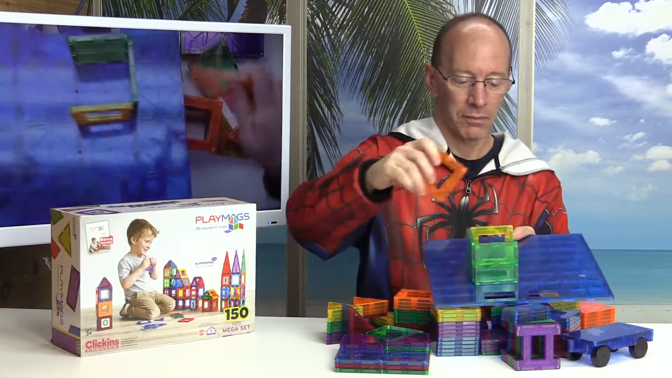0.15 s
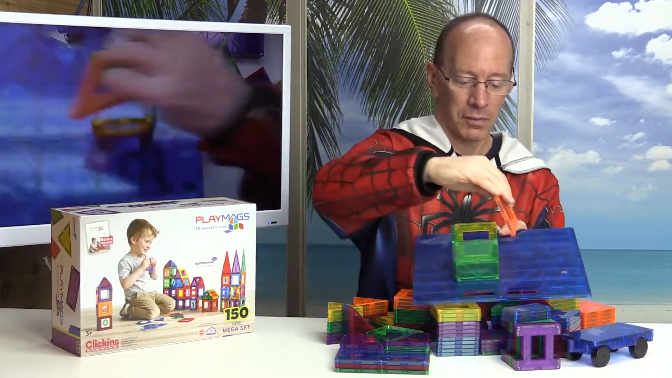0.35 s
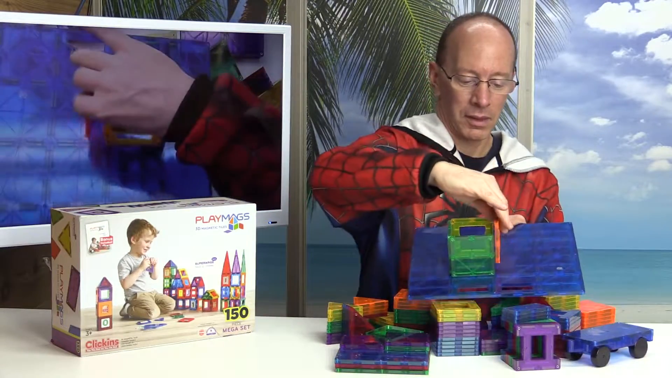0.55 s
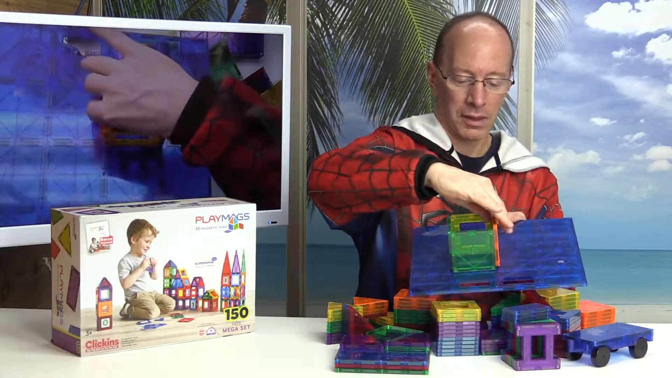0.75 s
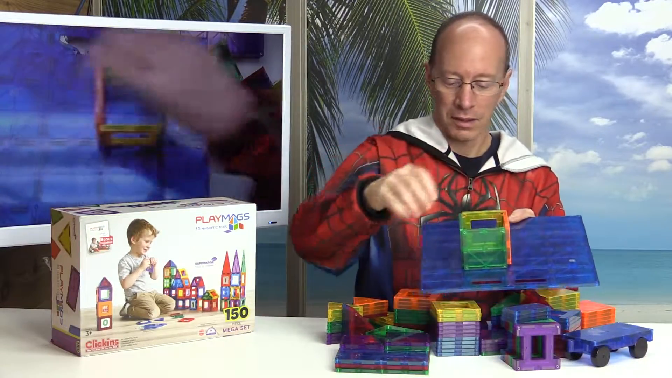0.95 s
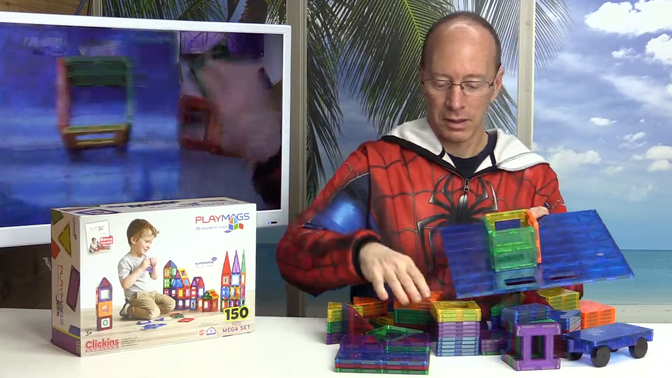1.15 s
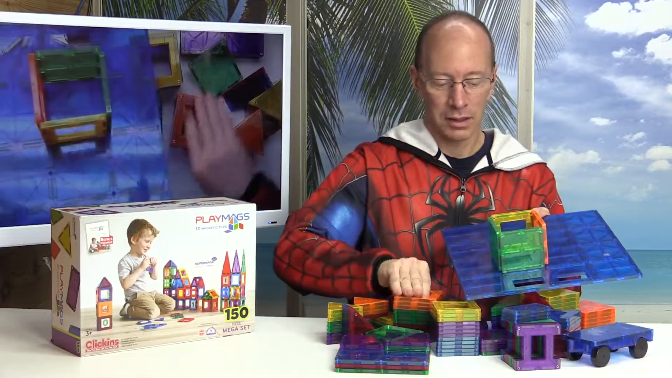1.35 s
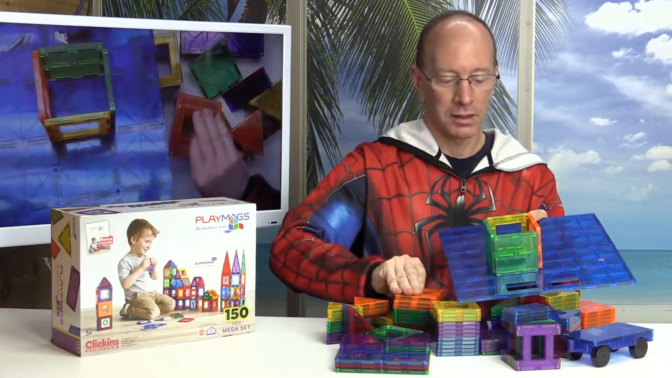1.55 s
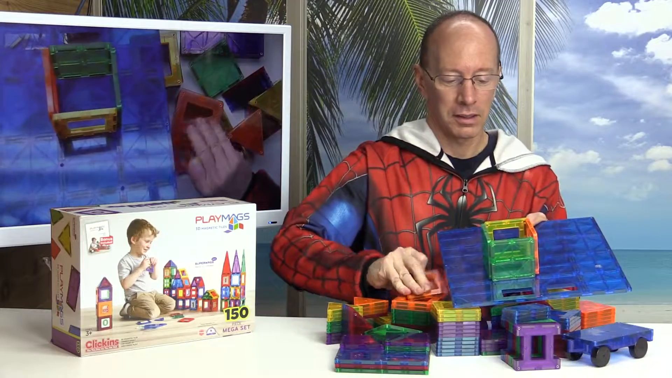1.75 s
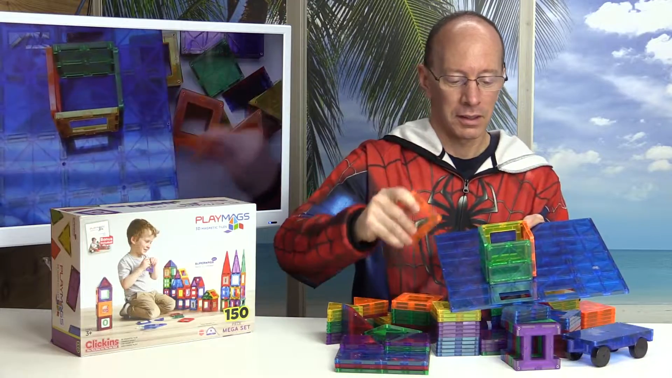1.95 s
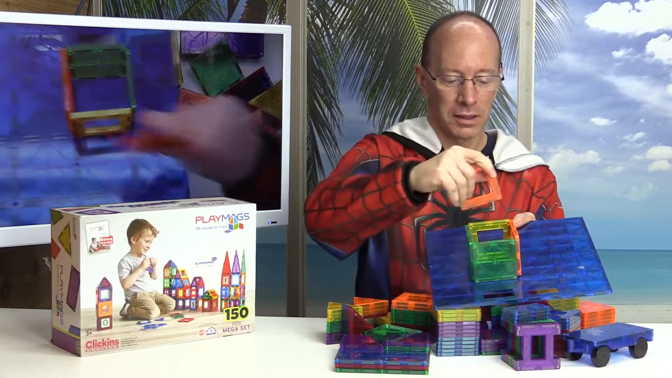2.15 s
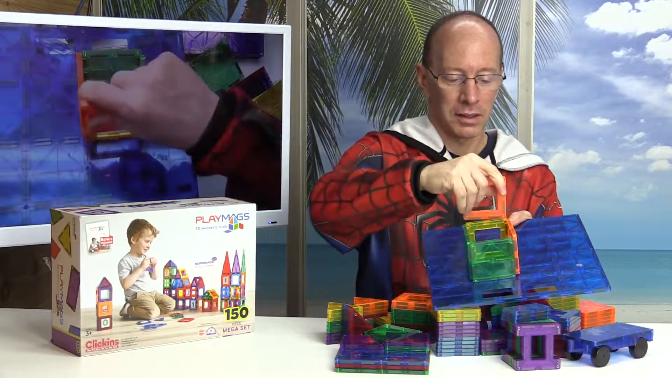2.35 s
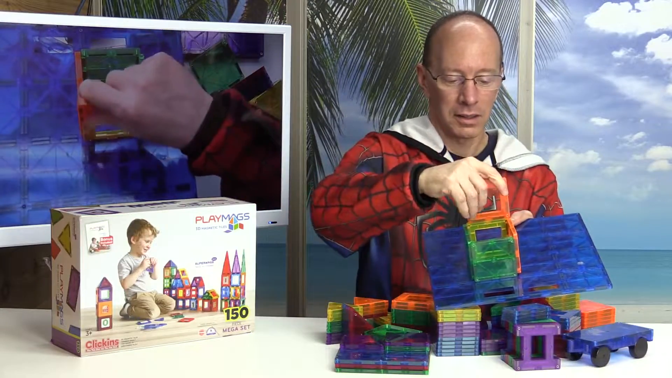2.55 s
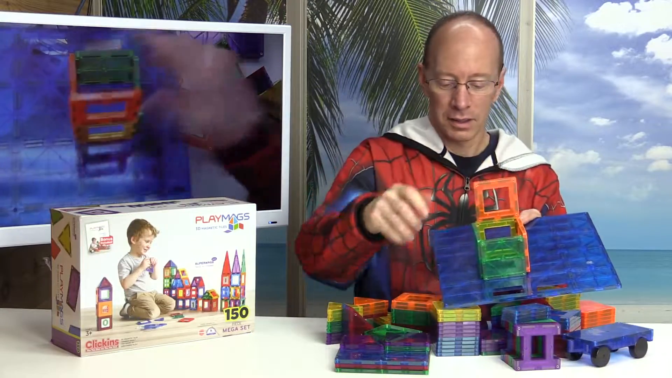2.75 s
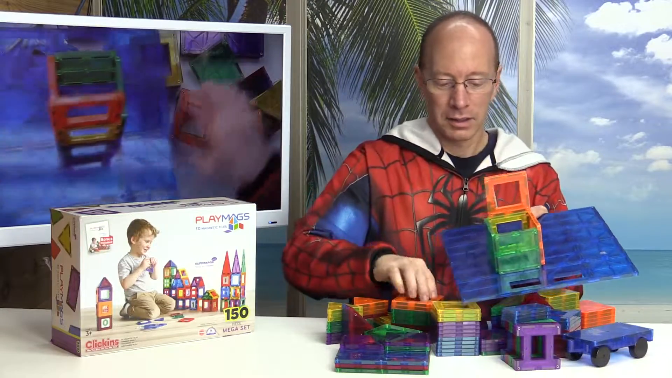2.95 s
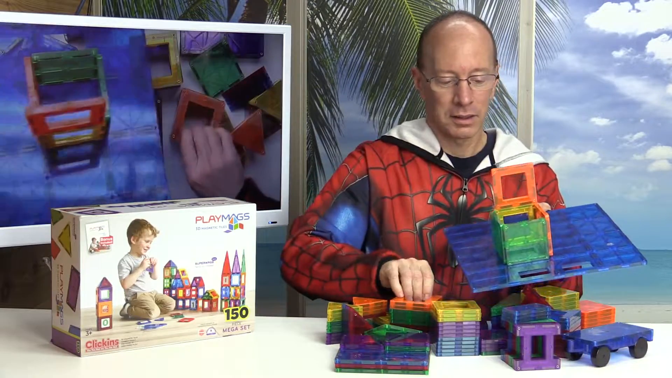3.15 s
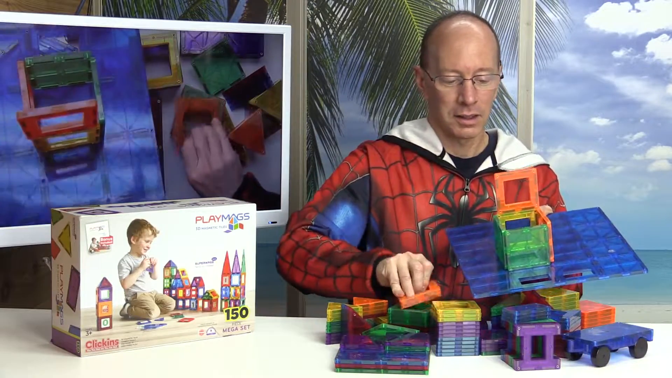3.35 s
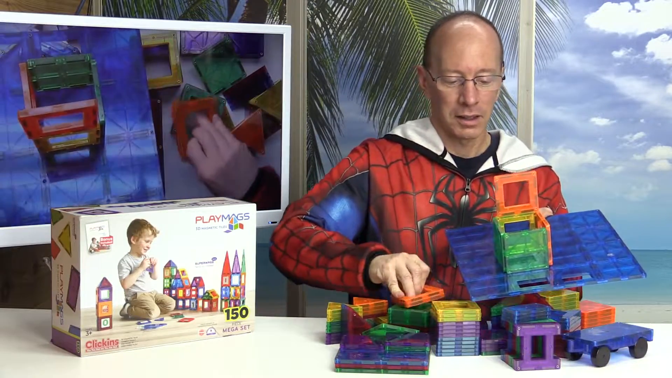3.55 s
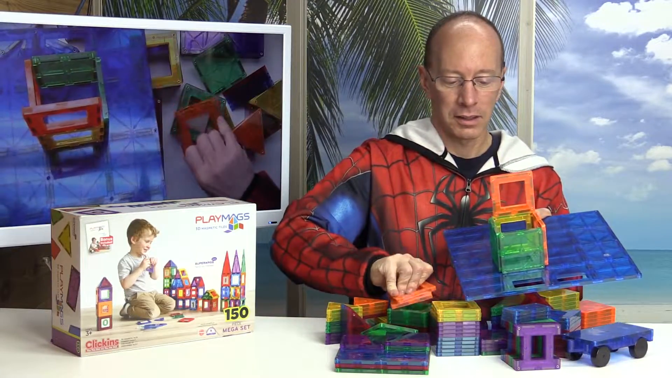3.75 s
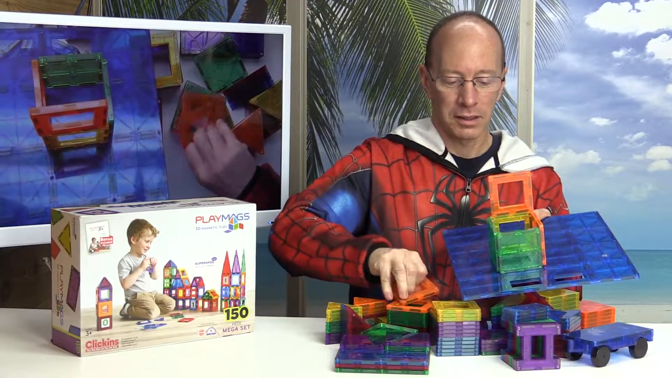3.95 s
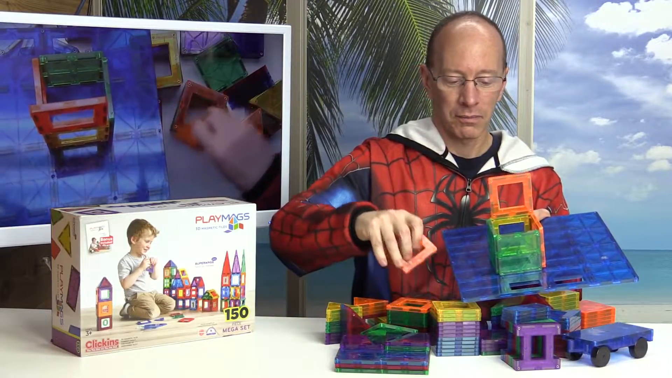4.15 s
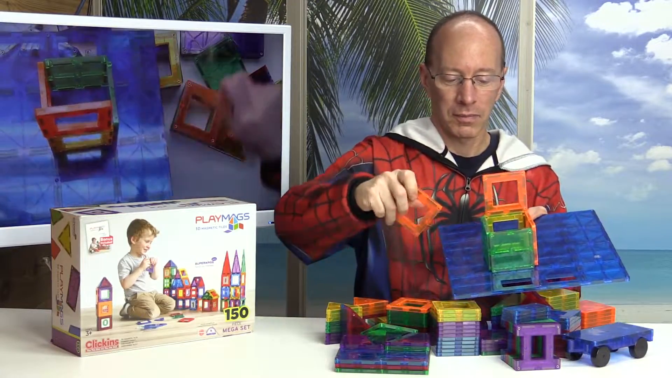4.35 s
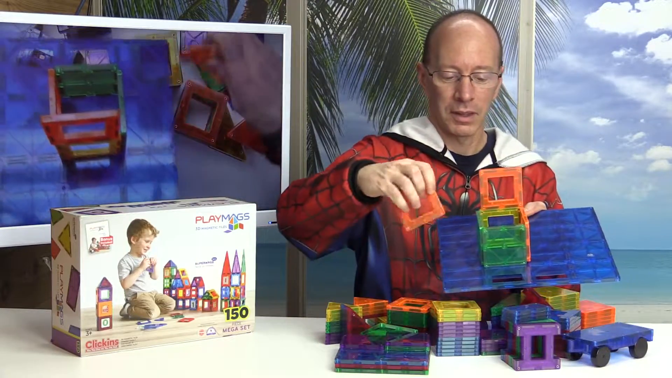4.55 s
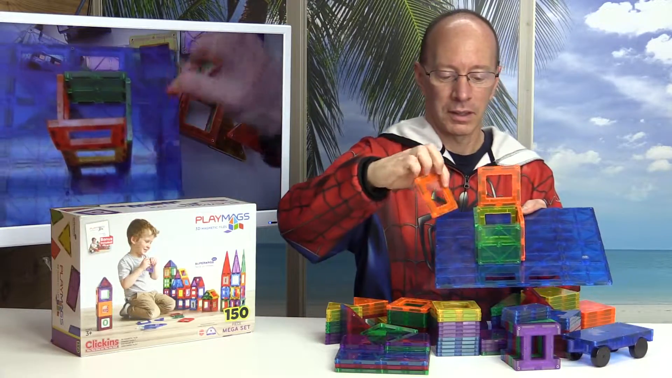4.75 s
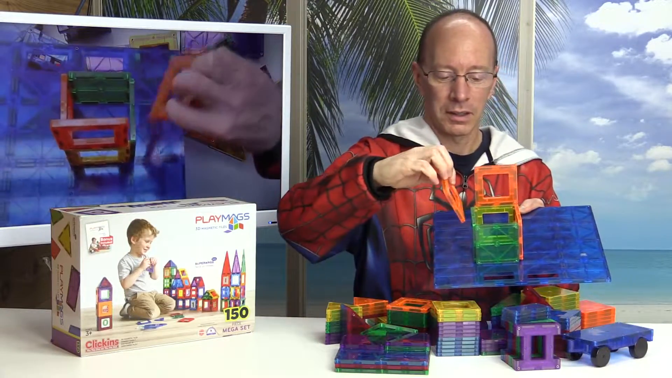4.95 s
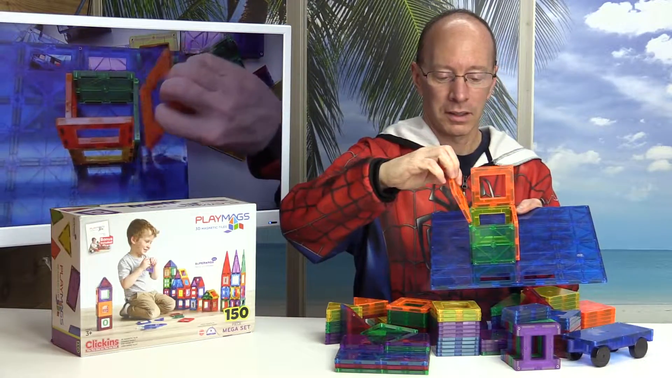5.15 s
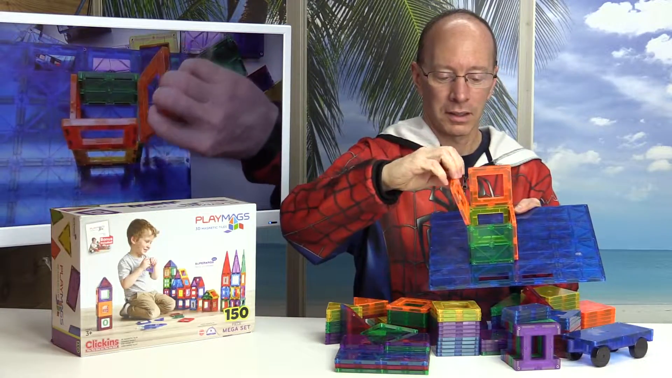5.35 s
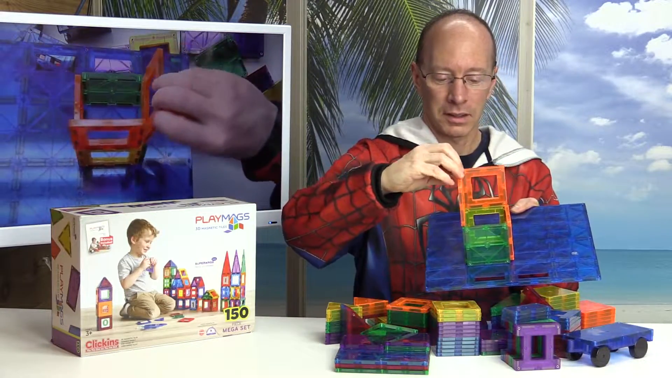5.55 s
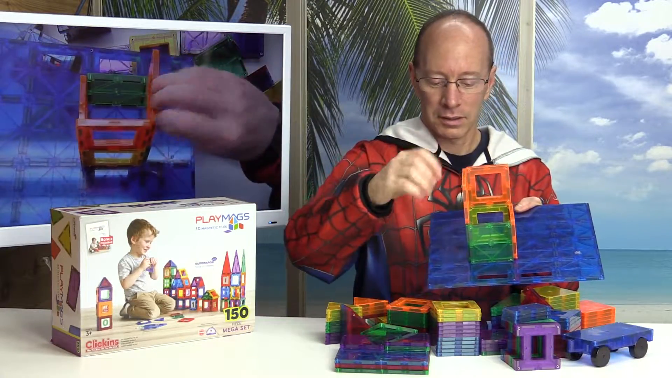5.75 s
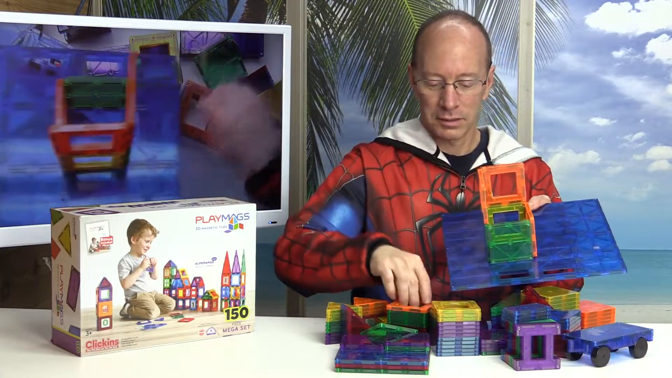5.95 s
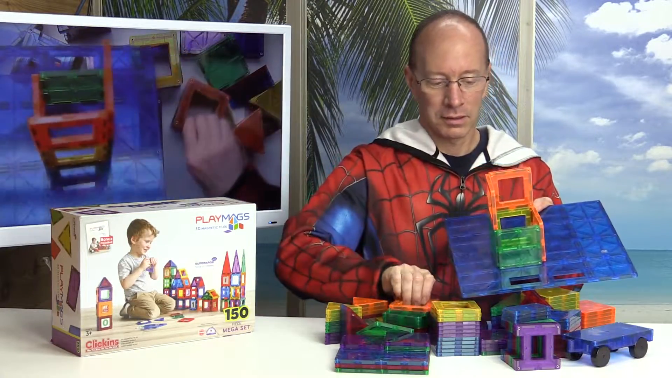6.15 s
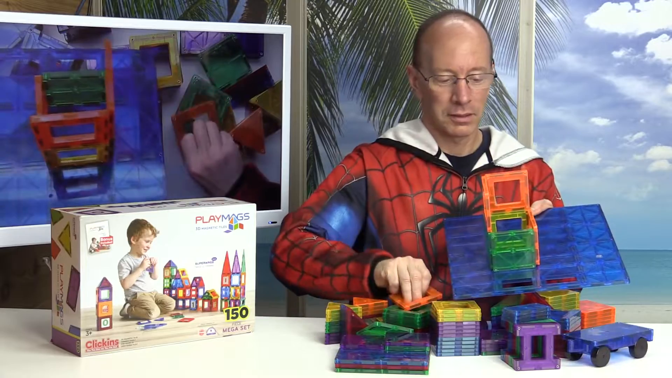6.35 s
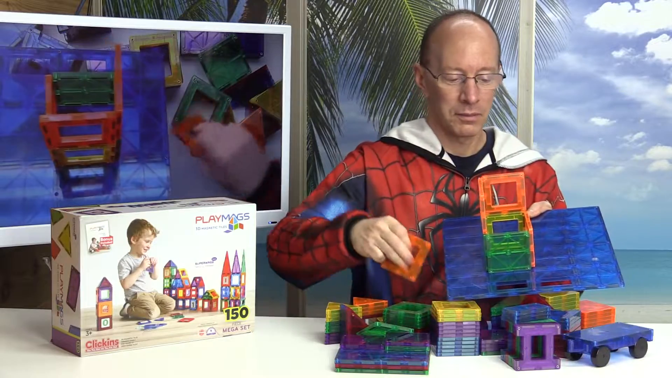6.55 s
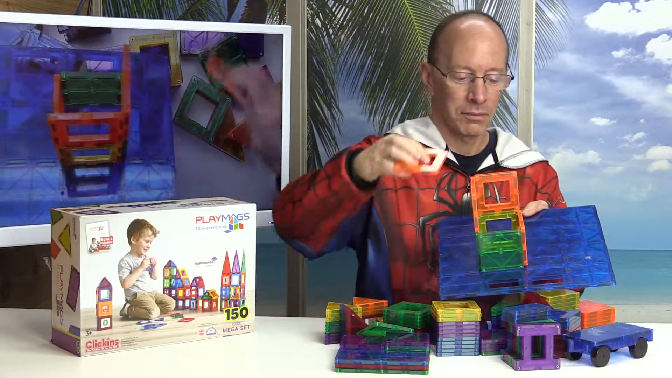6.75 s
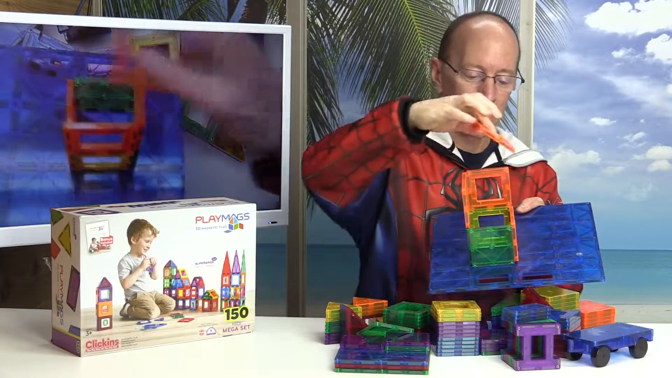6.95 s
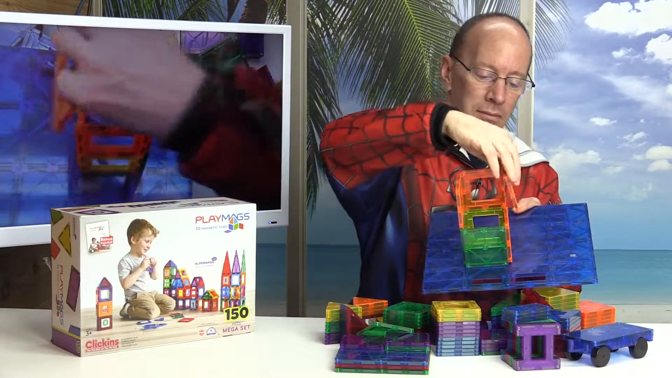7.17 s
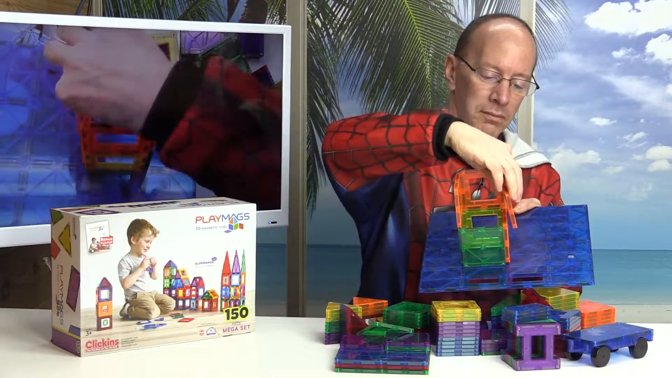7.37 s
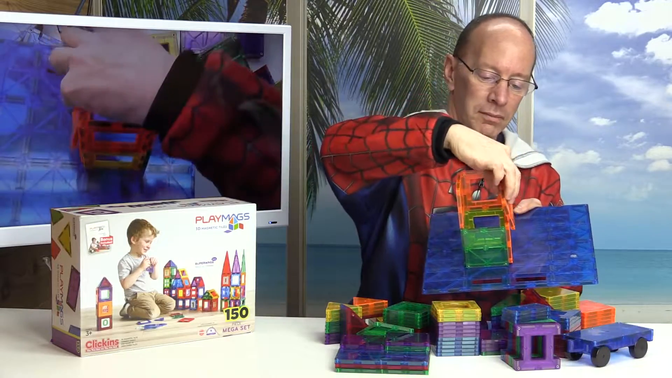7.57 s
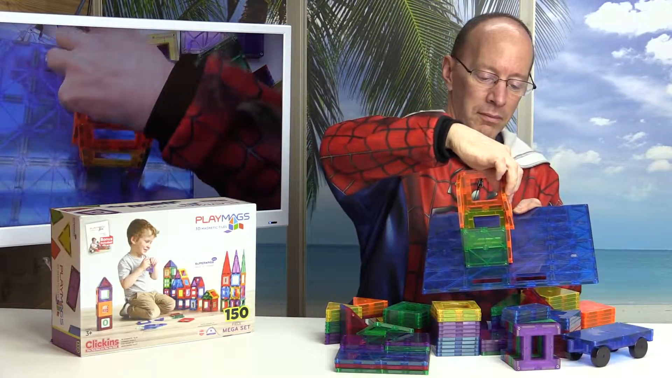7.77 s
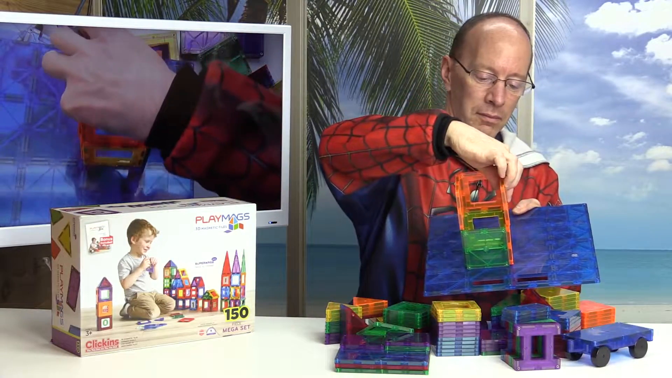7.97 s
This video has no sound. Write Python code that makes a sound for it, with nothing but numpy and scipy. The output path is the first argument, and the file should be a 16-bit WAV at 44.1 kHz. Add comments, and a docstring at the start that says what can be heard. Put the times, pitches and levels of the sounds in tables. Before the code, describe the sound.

Bright plastic clicks, light rattles and short scrapes come in irregular bursts, with hollow plate knocks and soft table thuds between brief lulls.

```python
"""Magnetic tile tower

Plastic magnetic tiles are pulled off a pile on a table and snapped onto a tower on a hand-held base plate.
Edges clack as noise bursts through tile resonances; loose magnets rattle as random taps in ringing pockets.
Sliding is clumped grains; the plate knocks in decaying sines; the table thuds as noise through its modes.
A small, fairly dry room adds a diffuse tail, air noise, faint mains hum and rumble; two close microphones."""
import sys
import numpy as np
from scipy import signal
from scipy.fft import rfft, irfft, next_fast_len
from scipy.io import wavfile
from scipy.ndimage import uniform_filter1d

SR = 44100
rng = np.random.default_rng(int(sys.argv[2]) if len(sys.argv) > 2 else 0)


def transcribe(signal):
    """Save signal, clipped to [-1, 1], as a 16-bit WAV file at the path in sys.argv[1]."""
    frames = np.atleast_2d(signal).T
    limited = np.clip(frames, -1, 1)
    pcm = np.round(limited * 32767).astype(np.int16)
    wavfile.write(sys.argv[1], SR, pcm)


N = 353417

# Event and mode levels are before the layer gain.
# tile edges clacking: t/s, level/dB, body re level/dB, top re level/dB, left minus right/dB
CLACKS = [(0.0242, -30, -1.5, -15.5, 3), (.036, -32, 3.5, -11, 0), (0.1633, -23.5, -29, -1, 9.5),
          (0.1761, -26, -17.5, -19, 4), (.205, -32.5, -31, -15, 9), (0.2809, -28, 3.5, -22, 2.5),
          (0.3018, -27, -9, -19, 6), (.3266, -29, -21, -20, 1), (.38, -38, 0, -20, 4),
          (0.411, -34.5, 3, -19, 1), (.4438, -39.5, 2, -10, 3), (0.486, -50.5, 7.5, -12, 2),
          (0.542, -42, 2.5, -6, 1), (0.567, -39.5, -5, -16, 5), (0.5953, -40, -8, -22, 4),
          (0.6304, -43, 5, -22, 4), (0.6772, -24.5, -0.5, -20, 4), (0.7058, -17.5, -6.5, -2, 4),
          (0.7242, -18, -5.5, -11, 2.5), (0.902, -53, 6, -18, 3), (1.114, -60.5, 9.5, -15, 3),
          (1.1989, -55, 8, -17, 0), (1.292, -46, 0, -4, 2), (1.4396, -28.5, -11, -13, 1),
          (1.4605, -17.5, -16, 0.5, 2), (1.479, -23, -11, -3, 0), (1.4962, -24.5, -17, 2, 2.5),
          (1.679, -30, -32, 5, 3), (1.6884, -27, -11.5, 0, -1), (1.7424, -25, -19, 1, 15),
          (1.7522, -16.5, -8, -2, 0), (1.7687, -22.5, -9, 0.5, 3), (1.8374, -27.5, -20, 0, 2),
          (1.917, -22.5, -5.5, -6, 4.5), (1.949, -23, -30, -2, 3), (1.9642, -26, -25, -15, 5),
          (2.062, -38.5, 6.5, -21, 1), (2.1077, -33.5, 2.5, -20, 3.5), (2.13, -34.5, -5, -25, 5.5),
          (2.1913, -29.5, -7.5, -21, 7), (2.2174, -36.5, 3.5, -7, -5), (2.234, -31, 0.5, -21, 3),
          (2.45, -25.5, -10, -7, 5.5), (2.4563, -23, -15, -5, 11), (2.469, -28.5, -8, -9, 1),
          (2.4984, -31.5, -1, -5, 5), (2.661, -51.5, 4, -32, 3), (2.781, -43, -2.5, -18, 4),
          (2.813, -42, -4, -25, 3), (2.8665, -36.5, 0.5, -20, 2.5), (2.915, -33.5, 0.5, -18, 3.5),
          (2.9448, -39, 4.5, -19, 1), (3.029, -43, -11, -20, 5), (3.0715, -38, 3.5, -19, 2),
          (3.278, -26, -16, -2, 4), (3.2977, -29.5, -9.5, -9, 2), (3.3272, -36, -3.5, -7, 3),
          (3.3635, -26.5, -14, -11, 4), (3.3769, -25, -8, -1, -0.5), (3.5164, -36.5, -5, -2, 1.5),
          (3.629, -22, -8.5, -1, 0), (3.746, -41.5, -12, -1, 2), (3.779, -21, -16, 2, 4),
          (3.8339, -14.5, -10.5, -2, -0.5), (3.839, -16, -25, -3, 4.5), (3.975, -23, -20, -15, 10),
          (3.9841, -18.5, -12, -1, 1), (4.0035, -18, -31, 1, -11), (4.0108, -20, -16, -5, 4),
          (4.0162, -13.5, -17.5, 0, 5), (4.1296, -22, -15, -4, 3), (4.1668, -27, -6, -18, 2),
          (4.229, -36.5, -27, -8, 3), (4.271, -35, -8, -17, 6), (4.2787, -29, -9, -19, 1),
          (4.3051, -32, -9, -6, 5), (4.3678, -37, -6.5, -12, 3), (4.419, -27.5, -13, -10, 6.5),
          (4.463, -31, -5, -19, 4.5), (4.4897, -29, -9, -18, 2), (4.5122, -22.5, -17, -10, 4.5),
          (4.5342, -31, -16, -8, 2), (4.5892, -23, -12.5, -13, 6), (4.61, -27.5, -22, -17, 10),
          (4.6255, -23.5, -15.5, -8, 3), (4.689, -35, -20, -5, 9), (4.738, -24, -10, -2.5, 4),
          (4.7662, -35, -14, -23, 5), (4.827, -41, -9, -17, 6), (4.8604, -24, -10, -12, 9.5),
          (4.873, -28.5, -8, 0, -8), (4.9019, -32, -7.5, -14, 8), (5.0143, -37.5, -11, -17, 7.5),
          (5.057, -39, -11, -11, 3), (5.101, -41.5, -5, -23, 1), (5.1476, -31, 1, -13, 7.5),
          (5.164, -29, 2, -9, 9), (5.1706, -26, -21, -20, 0), (5.188, -34, -19, -4, 11),
          (5.2153, -23, -4, -4, 6), (5.258, -39.5, -0.5, -21, 4), (5.309, -36, -3.5, -26, 7),
          (5.385, -29, -3.5, -23, 6.5), (5.418, -30.5, -0.5, -8, 5), (5.543, -50.5, 3.5, -23, 5),
          (5.6037, -19, -9.5, -1, 9), (5.6116, -11.5, -12.5, -0.5, 1), (6.104, -49.5, -9, 1.5, 2),
          (6.1526, -55, 9, -8, 0), (6.1846, -26, -8, -7, 1), (6.221, -19, -15, -7, 1),
          (6.25, -29.5, -25, -12, 11), (6.2837, -15.5, -12.5, 0, 0), (6.3042, -13, -9.5, -3, 2),
          (6.405, -12.5, -8.5, -4, 1.5), (6.5492, -34.5, -6.5, -21, 0), (6.6542, -33, -8, -12, 4.5),
          (6.718, -36, -25, -17, 3), (6.781, -43, -7, -11, -1), (6.818, -32, -9.5, 1, 4),
          (6.8376, -32.5, -12, -20, 1), (6.8665, -31, -5, -11, -2), (6.874, -27, -7.5, -22, 5.5),
          (6.9067, -35.5, -4, -21, 5), (6.9468, -34, -4.5, -28, 3), (6.9949, -29.5, -9, -20, 5),
          (7.0064, -25, -9, -20, 6), (7.0225, -37, -18, -17, 9), (7.1118, -15.5, -7.5, 2, 4),
          (7.1508, -29, -9, -15, 5), (7.327, -53, -1, -21, 6), (7.3625, -39, -5, -19, 4),
          (7.4248, -45, -5.5, -14, 4), (7.457, -44.5, -8, -21, 5), (7.505, -31.5, -6, 0, 2),
          (7.5107, -31, -13, -10, 13), (7.5448, -34, -19, -1, 12), (7.568, -27, -17, 4.5, 9.5),
          (7.5948, -19, -8.5, -7, 6), (7.65, -24.5, -16, -3, 5.5), (7.7725, -32, -8, -3.5, 7),
          (7.9423, -18, -11.5, 2.5, 5.5), (7.9537, -22.5, -7, -20, 8.5), (7.9704, -18.5, -11.5, -3, 3)]
# blows that reach the base plate: t/s, level/dB, pitch of struck spot f/Hz
PLATE_BLOWS = [(0.0369, -39, 675), (.2668, -30.5, 623), (0.4163, -38.5, 830), (.568, -39, 850),
               (0.6736, -26, 915), (0.7109, -26, 750), (0.7251, -22, 795), (1.3969, -40.5, 447),
               (1.7706, -34.5, 458), (1.9167, -46, 690), (2.092, -40, 530), (2.238, -43, 543),
               (2.258, -37, 596), (2.4575, -26, 730), (2.4675, -11, 624), (2.4979, -15, 720),
               (2.6618, -44.5, 533), (2.726, -37.5, 552), (2.757, -33, 545), (2.8693, -36, 560),
               (2.944, -42.5, 850), (2.9723, -35, 543), (3.0665, -37.5, 520), (3.127, -46.5, 520),
               (3.203, -44.5, 520), (3.863, -44, 450), (4.0171, -26.5, 880), (5.1641, -32, 900),
               (5.2164, -30, 580), (5.2594, -39.5, 866), (5.3119, -36.5, 820), (5.3825, -27, 515),
               (5.545, -45, 840), (5.6054, -26.5, 715), (6.2228, -41, 890), (6.3069, -28, 940),
               (6.404, -25.5, 950), (7.3642, -42, 836), (7.513, -35.5, 634), (7.5674, -36, 724),
               (7.596, -36, 680), (7.7824, -37.5, 739), (7.888, -43, 650), (7.9304, -40.5, 608),
               (7.954, -32, 690), (7.9803, -39.5, 666)]
# hand and tiles bumping the table: t/s, level/dB, contact softness as cut-off f/Hz, jostling t60/s
TABLE_BUMPS = [(.264, -23.5, 614, 0.11), (1.385, -28.5, 276, 0.32), (1.755, -27, 500, 0.22),
               (2.098, -36.5, 403, 0.12), (2.245, -32, 402, 0.13), (2.499, -31.5, 400, .017),
               (2.722, -26, 300, 0.028), (3.01, -13.5, 55, 0.075), (3.115, -32, 120, .1),
               (3.361, -39.5, 504, 0.29), (3.628, -21, 1570, 0.12), (3.741, -31, 197, .086),
               (3.78, -30, 400, 0.13), (3.861, -22.5, 349, 0.14), (4.014, -27.5, 450, 0.11),
               (4.049, -31.5, 270, 0.32), (6.063, -26, 99, .07), (6.112, -31, 220, 0.076),
               (6.188, -25.5, 253.3, 0.055), (6.319, -26.5, 350, 0.1), (6.415, -25.5, 353, 0.12)]
# base plate modes, before detuning and grip: f/Hz, level/dB, free t60/s
PLATE_MODES = [(400, -34, .08), (430, -16.5, 0.11), (539.2, -6.5, 0.14), (584, -19, 0.028),
               (683, -20, 0.35), (740, -18.5, .05), (786, -15.5, 0.1), (920, -19.5, 0.16),
               (1090, -22, 0.054), (1280, -6.5, 0.12), (1390, -23.5, 0.14)]
# table modes: f/Hz, width/Hz, level/dB
TABLE_MODES = [(55.6, 34.6, 4.5), (143, 78, -4.5), (242, 29, -6.5), (392.5, 160, -3), (520, 26, -17.5),
               (850, 370, -7.5), (1280, 150, -5)]
# tile resonances, before detuning: f/Hz, width/Hz, level/dB
TILE_MODES = [(3550, 340, 1.5), (5040, 1200, 11), (7170, 1800, 4), (8740, 2100, 9.5)]
# a magnet's pocket in the plastic: f/Hz, width/Hz, relative level/dB
POCKET_MODES = [(3800, 550, -12), (4620, 220, 1.5), (5160, 440, -1.5), (7030, 400, -7.5), (8100, 430, -9)]
# relative spectrum of the sliding: f/Hz, level/dB
SLIDE_SPECTRUM = [(250, -9), (600, -10.5), (1300, -10), (3200, -4.5), (4800, -6.5), (6600, -6),
                  (9000, -11.5), (14500, -16.5), (16500, -36.5)]
# relative spectrum of the room air: f/Hz, level/dB
AIR_SPECTRUM = [(15, -15.5), (30, -15), (58, 3.5), (85, -5.5), (170, -15.5), (280, -18.5), (420, -24),
                (560, -21.5), (1500, -35.5), (5000, -39), (15000, -39.5)]
# mains hum: f/Hz, rms before panning/dB
HUM = [(59.2, -53.5), (172.3, -69), (414.5, -68.5)]
# room tail: f/Hz, t60/s, relative level/dB
ROOM_TAIL = [(198, 0.078, -5.5), (700, 0.19, -7), (1800, 0.22, -6), (6050, 0.14, -4), (10100, 0.29, -22.5),
             (14200, 0.14, -5.5)]
# the hand damps the plate as it leans on the tower: t/s, share of the free ring time
GRIP = [(0, 0.81), (2.4, 0.61), (3.2, 1), (5.2, 0.79), (7.3, 0.25)]
# the hand fetches a tile: reaches pile t/s, lifts tile t/s, arrives at tower t/s, drag on table/dB
TRIPS = [(1.33, 1.945, 2, -55.5), (3.25, 4.103, 5.0, -54.5), (6.133, 6.467, 7.05, -46)]
# strokes of plastic on plastic: peak t/s, level/dB, swell time/s
SLIDES = [(.01, -27.5, .08), (.33, -40, .5), (.72, -29, .09), (1.18, -55, .2), (1.45, -46.5, .2),
          (1.77, -30, .11), (1.96, -28.5, .1), (2.11, -44, .15), (2.25, -30.5, .09), (2.5, -34, .09),
          (2.98, -51, .55), (3.36, -46, .25), (3.87, -37, .12), (4.01, -19, .08), (4.2, -41.5, .4),
          (4.6, -40.5, .3), (5.33, -48.5, .35), (6.3, -26, .16), (6.57, -38, .14), (6.88, -41, 0.36),
          (7.02, -34, .08), (7.36, -53, .15), (7.58, -28.5, .08), (7.8, -42, .14), (8.0, -29, .07)]
# jolts of the carried tile that shake its magnets: peak t/s, level/dB, swell time/s
SHAKES = [(.17, -35.5, .13), (2.0, -46, .3), (4.13, -42, .25), (4.53, -35.5, .27), (5.01, -53, .12),
          (6.87, -41, .35), (7.015, -31.5, .05)]

# chance touches: level re the (capped) motion; all four values share one spread
TOUCH_DB, TOUCH_BODY_DB, TOUCH_TOP_DB, TOUCH_LEFT_DB = 6, -9.5, -11.5, 2.5
TOUCH_SPREAD_DB = 5
REACH_S = 0.16  # the hand's way between pile and tower
PILE_LAG_SAMPLES, TOWER_LAG_SAMPLES = 8.3, 1.5  # of the left microphone
DRAG_FADE_DB_PER_S = 161  # before and after a pick
RESTING_DRAG_DB = -67.5  # arms resting on the table
SWELL_DB, EASE_DB = 20, 21  # gain in one swell time before the peak, loss in one after it
RUB_DB = -10  # plate groan re the stroke levels in SLIDES
CUTOFF_HZ = 16600


def tiles(level_db=1.08, body_gain_db=-2.0, top_gain_db=-5.5, broad_db=-9, detune=0.079,
          dull_top_db=-9, tilt=1.0, frame_width_hz=700, frame_db=1):
    """Hard contacts excite each tile's shell modes and a bending frame, panned per clack."""
    lead_s = .005
    s, db, body_db, top_db, pan_db = np.vstack([CLACKS, touches()]).T
    crack = cracks(len(s), lead_s)
    shell, body = from_db(broad_db) * crack, crack.copy()
    shifts = np.exp(detune * rng.standard_normal((len(s), len(TILE_MODES))))
    for k, shift in enumerate(shifts):
        # soft contacts favour the low resonances, sharp ones the high; the grip shifts each
        sharpness_db = tilt * np.clip(top_db[k] - dull_top_db, -10, 10)
        for (hz, width_hz, mode_db), factor in zip(TILE_MODES, shift):
            gain = from_db(mode_db + sharpness_db * np.log2(hz / 6000))
            shell[k] += gain * resonance(crack[k], hz * factor, width_hz)
        # the open frame bends at a pitch that depends on where it is held
        frame_hz = rng.uniform(1700, 3320)
        body[k] += from_db(frame_db) * resonance(crack[k], frame_hz, frame_width_hz)
    parts = [(filtered(shell, [3300, 10200], "band"), db),
             (filtered(body, [950, 3000], "band"), db + body_db + body_gain_db),
             (filtered(crack, [8600, 12300], "band"), db + top_db + top_gain_db)]
    clacks = 0
    for part, part_db in parts:
        # level = energy spread over 5 ms
        strength = np.sqrt(np.sum(part ** 2, axis=2, keepdims=True) / (.005 * SR))
        clacks = clacks + from_db(part_db)[:, None, None] * part / strength
    out = np.zeros((2, N))
    for at_s, clack, left_right_db in zip(s, clacks, pan_db):
        add(out, at_s - lead_s, from_db(level_db) * pan(left_right_db / 2) * clack)
    return out


def touches(count=70, busy_cap_db=-42):
    """Light clacks at random, likelier and stronger with more motion; rows as in CLACKS."""
    busy_db = np.minimum(np.maximum(movement_db(SLIDES), movement_db(SHAKES)), busy_cap_db)
    chance = np.cumsum(from_db(busy_db))
    at = np.minimum(np.searchsorted(chance / chance[-1], rng.random(count)), N - 1)
    means_db = np.array([TOUCH_DB, TOUCH_BODY_DB, TOUCH_TOP_DB, TOUCH_LEFT_DB])
    rows = means_db + TOUCH_SPREAD_DB * rng.standard_normal((count, 4))
    return np.column_stack([at / SR, busy_db[at] + rows[:, 0], rows[:, 1:]])


def cracks(count, lead_s, crack_t60_s=.019, ring_t60_s=.07, ring_db=-21, rise_s=.0006,
           vary_db=2.2, touch_db=-23, apart=.9, grain_db=3):
    """Noise as dense plastic modes: light touch, crack, weak ring; contacts x channels x samples."""
    t = np.arange(SR // 16) / SR - lead_s
    after = np.maximum(t, 0)
    length, slowness = from_db(vary_db * rng.standard_normal((count, 2))).T[:, :, None]
    envelope = decay(after, crack_t60_s * length) + from_db(ring_db) * decay(after, ring_t60_s)
    envelope = envelope * (1 - np.exp(-after / (rise_s * slowness)))
    envelope = envelope + from_db(touch_db) * np.maximum(1 - abs(t) / lead_s, 0)
    # the edges chatter as the magnets pull them home
    chatter = rms_one(uniform_filter1d(rng.standard_normal(envelope.shape), size=32))
    envelope = envelope * from_db(grain_db * chatter)
    # a tile radiates differently towards each microphone
    noise = rng.standard_normal((count, 3, len(t)))
    return envelope[:, None] * (noise[:, :1] + apart * noise[:, 1:])


def magnets(level_db=-2, taps_per_s=140, size_db=1.0, apart=0.52, left_db=2):
    """Each magnet chatters against its pocket and sets the plastic ringing."""
    taps = impulses(taps_per_s, size_db) * stereo_noise(apart) + 1e-18
    rings = sum(from_db(db) * resonance(taps, hz, width_hz) for hz, width_hz, db in POCKET_MODES)
    return from_db(movement_db(SHAKES) + level_db) * pan(left_db) * rms_one(rings)


def sliding(level_db=-6, grain_db=3, slips_per_s=3000, stick_db=5, apart=0.84, left_db=1.0):
    """Plastic rubs on plastic: tiny slips in clumps, with sticking in between."""
    unevenness = rms_one(filtered(rng.standard_normal(N), 47, "low"))
    clumps = from_db(stick_db * np.clip(unevenness, -2, 2))
    grains = clumps * impulses(slips_per_s, grain_db) * stereo_noise(apart)
    return from_db(movement_db(SLIDES) + level_db) * pan(left_db) * coloured(grains, SLIDE_SPECTRUM)


def plate(level_db=4.5, soft_hz=2200):
    """The wide base plate answers with a hollow knock that changes with the point of contact."""
    out = np.zeros(N)
    for s, db, hz in PLATE_BLOWS:
        free = np.interp(s, *np.transpose(GRIP))
        add(out, s, from_db(db + level_db) * knock(hz, free))
    return filtered(out, [290, soft_hz], "band")


def knock(hz, free, spread_db=2, reach_octaves=0.54, detune=0.017, flex_t60_s=0.013, flex_db=2,
          judder_db=-7, judder_t60_s=.055):
    """The struck spot flexes briefly, plate modes near its pitch ring on and the tower judders."""
    t = np.arange(SR // 7) / SR
    mode_hz, db, t60_s = np.transpose(PLATE_MODES)[:, :, None]
    # a firmer grip shifts the modes further and shortens them
    mode_hz = mode_hz * np.exp(detune / free ** 2 * rng.uniform(-1, 1, db.shape))
    nearness = 1 / (1 + (np.log2(mode_hz / hz) / reach_octaves) ** 4)
    strength = from_db(db + spread_db * rng.standard_normal(db.shape)) * nearness
    modes = strength * decay(t, t60_s * free) * np.sin(2 * np.pi * mode_hz * t)
    flex = from_db(flex_db) * decay(t, flex_t60_s) * np.sin(2 * np.pi * hz * t)
    rattle = filtered(rng.standard_normal(len(t)), [.75 * hz, 2.8 * hz], "band")
    judder = from_db(judder_db) * decay(t, judder_t60_s) * rattle
    return flex + judder + np.sum(modes, axis=0)


def plate_rub(slips_per_s=120, size_db=4, width_hz=90):
    """Fingers pressing on the tower slip in tiny steps and make the base plate groan softly."""
    slips = impulses(slips_per_s, size_db) * rng.standard_normal(N) + 1e-18
    groan = np.zeros(N)
    for k, (hz, db, _) in enumerate(PLATE_MODES):
        groan += (-1) ** k * from_db(db) * resonance(slips, hz, width_hz)
    groan = rms_one(filtered(groan, [520, 880], "band"))
    return from_db(movement_db(SLIDES) + RUB_DB) * (1 - near_pile()) * groan


def table(level_db=19.5, drag_hz=380, rise_s=0.00047):
    """Jostling tiles push unevenly on the table top; soft touches wake only its low modes."""
    t = np.arange(SR // 4) / SR
    force = from_db(drag_db()) * filtered(rng.standard_normal(N), drag_hz, "low")
    for s, db, soft_hz, t60_s in TABLE_BUMPS:
        push = rng.standard_normal(len(t)) * decay(t, t60_s) * (1 - np.exp(-t / rise_s))
        add(force, s, from_db(db) * filtered(push, soft_hz, "low"))
    modes = sum(from_db(db + level_db) * resonance(force, hz, width_hz)
                for hz, width_hz, db in TABLE_MODES)
    return filtered(modes, 81, "high")


def drag_db():
    """The table rumbles for as long as the hand works a tile loose from the pile."""
    t = np.arange(N) / SR
    picks = [db - DRAG_FADE_DB_PER_S * abs(t - np.clip(t, reach, lift))
             for reach, lift, _, db in TRIPS]
    return np.maximum(np.max(picks, axis=0), RESTING_DRAG_DB)


def movement_db(strokes):
    """Each movement swells to its peak and eases off; the strongest one leads."""
    t = np.arange(N) / SR
    level_db = np.full(N, -120.0)
    for s, db, swell_s in strokes:
        fall_db = np.maximum(SWELL_DB * (s - t), EASE_DB * (t - s)) / swell_s
        level_db = np.maximum(level_db, db - fall_db)
    return level_db


def near_pile():
    """Where the hand is: 1 over the pile, 0 at the tower."""
    return sum(in_time([(reach - REACH_S, 0), (reach, 1), (arrive - REACH_S, 1), (arrive, 0)])
               for reach, _, arrive, _ in TRIPS)


def at_microphones(x):
    """Sound reaches the left microphone a little later, more so from the pile."""
    lag = TOWER_LAG_SAMPLES + (PILE_LAG_SAMPLES - TOWER_LAG_SAMPLES) * near_pile()
    source = np.arange(N) - np.round(lag).astype(int)
    return np.array([x[0, np.clip(source, 0, N - 1)], x[1]])


def room(x, build_s=0.0011):
    """A diffuse tail that dies band by band and is alike on both sides in the bass."""
    t = np.arange(SR // 2) / SR
    hz, t60_s, db = np.transpose(ROOM_TAIL)
    edges_hz, tail = np.geomspace(100, 18000, num=9), 0
    for low, high in zip(edges_hz, edges_hz[1:]):
        centre_hz = np.sqrt(low * high)
        band_t60_s = np.interp(np.log(centre_hz), np.log(hz), t60_s)
        band_db = np.interp(np.log(centre_hz), np.log(hz), db)
        envelope = decay(t, band_t60_s) * (1 - np.exp(-t / build_s)) ** 2
        envelope = envelope / np.linalg.norm(envelope)
        alike = 1 / (1 + (centre_hz / 800) ** 2)
        noise = np.sqrt(alike) * rng.standard_normal(len(t))
        noise = noise + np.sqrt(1 - alike) * rng.standard_normal((2, len(t)))
        tail = tail + from_db(band_db) * filtered(noise * envelope, [low, high], "band")
    return signal.fftconvolve(x, tail, axes=1)[:, :N]


def background(air_db=-56.5, apart=1.0, hum_left_db=-2.0, rumble_db=-62, rumble_hz=45):
    """Coloured noise as room air, steady sines as appliance hum, faint low rumble on the right."""
    t = np.arange(N) / SR
    hum = sum(from_db(db) * np.sqrt(2) * np.sin(2 * np.pi * (hz * t + rng.random())) for hz, db in HUM)
    air = from_db(air_db) * coloured(stereo_noise(apart), AIR_SPECTRUM)
    rumble = rms_one(filtered(rng.standard_normal(N), [15, rumble_hz], "band"))
    return hum * pan(hum_left_db) + air + np.array([np.zeros(N), from_db(rumble_db) * rumble])


def from_db(db):
    """Amplitude factor of a level."""
    return 10 ** (np.asarray(db) / 20)


def pan(left_db):
    """Gains that raise the left and lower the right by the same dB."""
    return from_db([[left_db], [-left_db]])


def rms_one(x):
    """Scale to rms 1."""
    return x / np.sqrt(np.mean(x ** 2) + 1e-20)


def in_time(rows):
    """Straight lines through (t/s, value)."""
    return np.interp(np.arange(N) / SR, *np.transpose(rows))


def impulses(per_s, size_db):
    """Sparse random impulses of uneven size."""
    hits = rng.random(N) < per_s / SR
    return hits * from_db(size_db * np.minimum(rng.exponential(1, N), 3))


def stereo_noise(apart):
    """Noise common to both sides plus a separate share for each."""
    return rng.standard_normal(N) + apart * rng.standard_normal((2, N))


def filtered(x, hz, kind, order=2):
    """Butterworth filter."""
    sos = signal.butter(order, np.clip(hz, 10, .45 * SR), kind, fs=SR, output="sos")
    return signal.sosfilt(sos, x)


def decay(t, t60_s):
    """Exponential fall of 60 dB in t60."""
    return np.exp(-np.log(1000) * t / t60_s)


def add(out, s, sound):
    """Mix a sound in at a time."""
    at = max(round(s * SR), 0)
    out[..., at:at + sound.shape[-1]] += sound[..., :max(N - at, 0)]


def coloured(x, spectrum):
    """Give a noise a spectrum; rms 1."""
    hz, db = np.transpose(spectrum)
    size = next_fast_len(N)
    bins_hz = np.fft.rfftfreq(size, 1 / SR)
    gain = from_db(np.interp(np.log(bins_hz + 1), np.log(hz), db))
    return rms_one(irfft(rfft(x, size) * gain, size)[..., :N])


def resonance(x, hz, width_hz):
    """Two-pole resonator."""
    r = np.exp(-np.pi * width_hz / SR)
    feedback = [1, -2 * r * np.cos(2 * np.pi * hz / SR), r * r]
    return signal.lfilter(np.array([1, 0, -1]) * (1 - r * r) / 2, feedback, x)


def scene(plate_left_db=0.8, table_left_db=1.54):
    """Tiles, magnets, plate and table sound together in the room."""
    bodies = (plate() + plate_rub()) * pan(plate_left_db) + table() * pan(table_left_db)
    direct = at_microphones(tiles() + magnets() + sliding() + bodies)
    return direct + room(direct) + background()


def record(dry):
    """Peaks clip at full scale, then a steep low-pass cuts the top."""
    lowpass = signal.ellip(10, .2, 80, CUTOFF_HZ, fs=SR, output="sos")
    return signal.sosfilt(lowpass, np.clip(dry, -1, 1))


dry = scene()
out = record(dry)
transcribe(out)
```